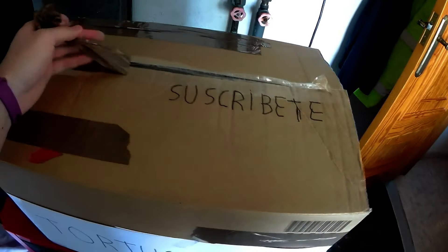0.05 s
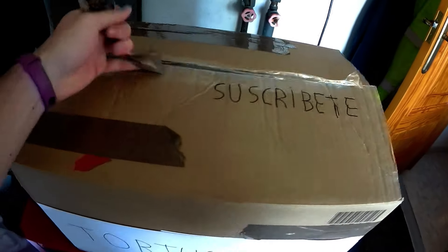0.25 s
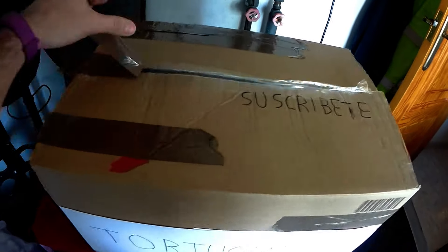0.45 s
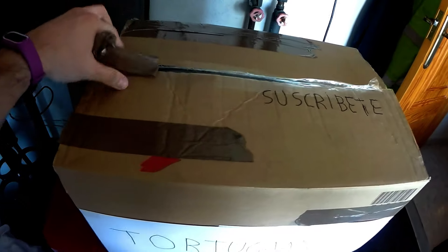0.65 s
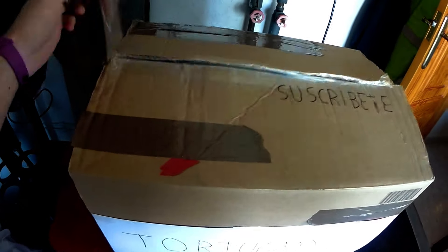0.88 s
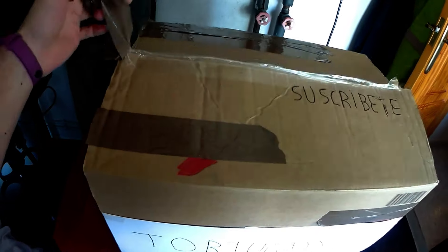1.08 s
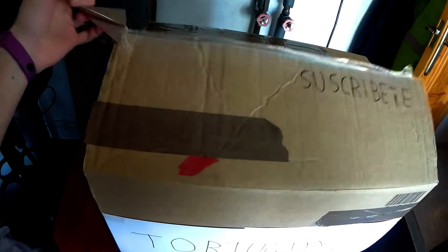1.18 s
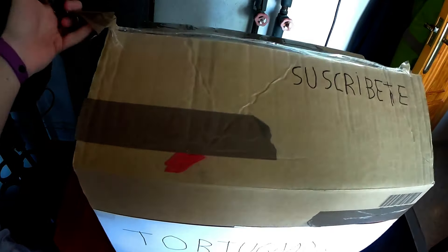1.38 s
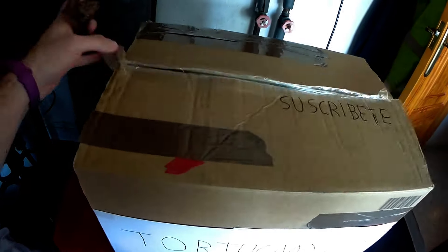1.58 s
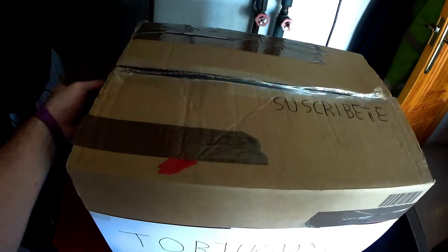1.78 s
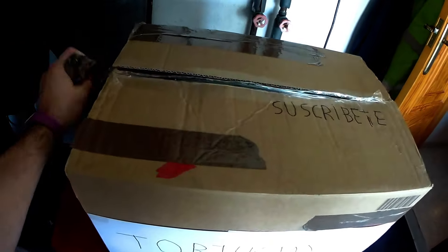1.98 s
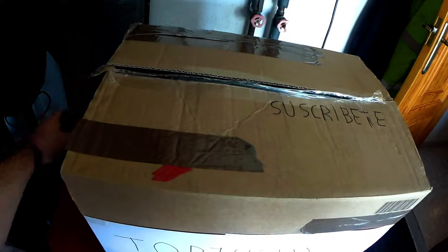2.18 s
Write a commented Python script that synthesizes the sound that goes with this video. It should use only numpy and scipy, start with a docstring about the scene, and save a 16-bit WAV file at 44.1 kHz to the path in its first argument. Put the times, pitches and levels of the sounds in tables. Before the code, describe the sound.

Close up in a small room, packing tape tears from a cardboard box in brief, uneven jerks. Between the rips the loose tape crinkles and scrapes, with hollow knocks from the flaps and a low rumble from the shifting box.

```python
"""Packing tape is ripped off a cardboard box in several short pulls, close by in a small room.
The glue lets go in dense tiny slips that crackle in the film and rasp through the cardboard.
The flaps lift and thump back, the box shifts with a low rumble, and the loose tape
crinkles, snaps and scrapes in the hand throughout."""
import sys
import numpy as np
from scipy import signal
from scipy.fft import rfft, irfft
from scipy.io import wavfile
from scipy.ndimage import uniform_filter1d

SR = 44100
rng = np.random.default_rng(int(sys.argv[2]) if len(sys.argv) > 2 else 0)


def digitize_waveform(pressure):
    """Quantize a signal to 16-bit integers and store it at the path in sys.argv[1].

    Rows of a 2-D input are taken as channels; values are limited to [-1, 1].
    """
    field = np.atleast_2d(pressure).T
    bounded = np.clip(field, -1, 1)
    quanta = np.round(bounded * 32767).astype(np.int16)
    wavfile.write(sys.argv[1], SR, quanta)


N = 99225

# Room decay. Each row: frequency in Hz, T60 in seconds.
ROOM_T60 = [(80, 0.13), (250, 0.3), (700, .6), (2000, 0.46), (5000, 0.32), (11000, 0.12)]
# Box shifting. Each row: time in seconds, rumble level in dB.
SHIFT_LEVELS = [(0, -38.5), (.11, -61), (.19, -43), (.23, -28.5), (.33, -48), (.585, -55.5), (.605, -33),
                (.71, -52), (.78, -30), (.95, -48), (1.12, -56), (1.24, -40), (1.32, -57), (1.46, -55),
                (1.635, -36), (1.675, -29), (1.77, -37.5), (2.04, -40.5), (2.12, -54), (2.25, -46)]
# Tape handling. Each row: time in seconds, crinkle level in dB, scrape level in dB.
HANDLING_LEVELS = [(0, -30.5, -40), (.045, -35, -40), (.11, -31.5, -33.5), (.185, -25, -35),
                   (.29, -25, -25.5), (0.428, -34, -45), (0.482, -36, -46.5), (.59, -43, -34.5),
                   (.635, -34.5, -36), (.71, -33, -34.5), (.89, -26, -40), (0.982, -34, -46),
                   (1.02, -30.5, -63), (1.15, -29, -40.5), (1.3, -28, -47), (1.37, -33, -38),
                   (1.52, -40.5, -34.5), (1.61, -32.5, -36.5), (1.77, -31, -38), (2.03, -33.5, -35),
                   (2.099, -29, -44), (2.25, -30, -48.5)]
# Spectra of box rumble, cardboard scrape, loose film, pulled film and cardboard rasp.
# Each row: frequency in Hz, relative gain in dB.
RUMBLE_SPECTRUM = [(15, -28), (35, -4.5), (62, 4.5), (80, 4), (110, -13.5), (200, -2.5), (500, -1),
                   (2000, -30)]
SCRAPE_SPECTRUM = [(70, -3), (140, -5), (205, 5.5), (300, -4), (440, -6), (650, -8), (1300, -2.5),
                   (2500, -5.5), (4000, -22), (11000, -46)]
LOOSE_FILM_SPECTRUM = [(100, -14), (220, -5.5), (430, 0), (700, 3), (1300, 0.5), (2600, 2), (3900, -5),
                       (5200, -3), (7200, -1), (8200, -4.5), (9200, -11.5), (11000, -12)]
PULLED_FILM_SPECTRUM = [(100, -31), (500, -44.5), (1200, -3.5), (2000, 1), (2800, 4), (3900, -7.5),
                        (5200, -4), (7200, 2), (8200, -2.5), (9200, -11), (11000, -10.5)]
BOARD_SPECTRUM = [(60, -4.5), (140, -16.5), (220, 4.5), (330, -4.5), (440, -1.5), (620, 1.5), (850, -4),
                  (1400, 4), (1900, -10.5), (2900, -6), (4000, -14), (11000, -36.5)]
# Box resonances and notches. Each row: centre in Hz, width in Hz, gain in dB.
BOX_RESONANCES = [(194.4, 39, 4), (277.3, 22, 13), (354, 6.4, 6.5), (637, 46, 7.5), (767, 26, 6),
                  (972.6, 52, 8), (1160, 28, 6), (1358, 18, -11), (1462, 25, 8), (2216, 40, 10),
                  (2490, 44, 4.5), (2634, 17, -5)]
# Flap modes. Each row: ratio to the pitch, level in dB, T60 in seconds.
FLAP_MODES = [(.36, -27.5, 0.11), (0.998, -2, 0.084), (1.378, -6, 0.063), (1.75, -12, 0.02)]
# Flap thumps. Each row: start in seconds, level in dB, pitch in Hz.
FLAP_THUMPS = [(0.213, -17, 202), (.395, -29, 195), (.241, -3, 217), (.264, -4, 254), (0.603, -24, 130),
               (.652, -37, 229), (.811, -8, 205), (0.85, -14, 205), (1.092, -32, 320), (1.196, -23, 192),
               (1.234, -13.5, 212), (1.4429, -6, 209.4), (1.483, -16, 229), (1.574, -18, 208),
               (1.657, -13.5, 204), (1.673, -4.5, 238), (1.851, -20, 210), (1.929, -16, 240),
               (1.984, -12, 225)]
# Film snaps. Each row: start in seconds, level in dB, band centre in Hz, decay in seconds.
FILM_SNAPS = [(.0238, -24, 6000, 0.00043), (.097, -26.5, 5140, 0.0011), (.124, -29, 5000, 0.0005),
              (.1575, -34, 5000, 0.00086), (.1945, -23, 6500, .002), (.3845, -31, 2700, .001),
              (.398, -27, 7000, 0.0027), (.43, -28, 2820, 0.0028), (.635, -26, 3050, .001),
              (.6955, -28, 2820, 0.0027), (.781, -30, 3000, 0.00091), (0.9089, -27, 2470, .002),
              (.921, -17, 3170, 0.00068), (1.0005, -29.5, 5070, 0.0019), (1.1028, -22.5, 1400, 0.0015),
              (1.0475, -23, 3460, 0.0012), (1.061, -31, 1410, 0.0047), (1.0945, -21.5, 1370, 0.00078),
              (1.1465, -22.5, 5440, 0.0013), (1.1735, -33, 6600, 0.00057), (1.1845, -22, 6000, .0007),
              (1.2153, -11.5, 2500, 0.00077), (1.2333, -14, 6500, .0008), (1.2647, -20.5, 6760, 0.0012),
              (1.267, -19, 6800, 0.00094), (1.298, -24, 2120, 0.0026), (1.4425, -38, 6330, 0.0009),
              (1.538, -30.5, 6900, 0.0018), (1.5565, -30, 2960, 0.0011), (1.6415, -30, 4430, 0.00062),
              (1.661, -45, 5070, 0.0011), (1.686, -28, 4330, 0.00052), (1.817, -28.5, 6030, 0.0023),
              (1.9505, -20, 2500, 0.0014), (2.0513, -26, 5600, 0.00071), (2.0807, -23.5, 2520, 0.0014),
              (2.1293, -19, 5400, 0.00094), (2.159, -50, 5840, 0.0017), (2.227, -32, 6200, 0.00078)]
# Tape rips. Each row: start in seconds, length in seconds, film crackle in dB,
# cardboard rasp in dB, panel pitch in Hz, panel ring in dB.
TAPE_RIPS = [(0.2002, 0.032, -8, -6.5, 645, -10.5), (.242, 0.0021, -18, -14, 1320, -21),
             (.251, 0.017, -12.5, -6.5, 966, -16.5), (0.272, 0.029, -25.5, -18, 637, -23),
             (0.623, 0.011, -31, -33, 2700, -26), (0.6517, 0.0063, -26, -22, 1184, -25),
             (0.723, 0.0087, -24, -32, 1385, -22), (0.731, 0.029, -14, -21.5, 1420, -30),
             (0.761, 0.006, -4, -13, 1470, -16), (0.77, 0.034, -15.5, -20, 2550, -26),
             (0.805, 0.013, -23, -19, 655, -23), (.822, 0.046, -24, -33, 1394, -27.5),
             (0.844, 0.011, -37, -23, 1470, -16), (0.9112, 0.012, -22, -30, 1440, -24.5),
             (1.093, 0.0099, -28, -33.5, 1320, -22.5), (1.193, 0.023, -23.5, -20, 1146, -28.5),
             (1.214, 0.047, -30.5, -26.5, 747, -34.5), (1.436, 0.0099, -44, -23, 710, -27.5),
             (1.444, 0.013, -28.5, -17, 1495, -22), (1.479, 0.0069, -33, -15, 2970, -23.5),
             (1.557, 0.036, -31.5, -34, 1063, -40), (1.657, 0.011, -23, -16, 3020, -22),
             (1.672, 0.013, -22, -13, 1450, -14), (1.7, 0.044, -27.5, -26.5, 1454, -27),
             (1.8436, 0.017, -14.5, -20, 1421, -19.5), (1.863, 0.028, -20.5, -23, 616.5, -13),
             (1.885, 0.046, -22, -19.5, 681, -33), (1.923, 0.016, -26, -17.5, 497, -20),
             (1.936, 0.014, -18.5, -19, 574, -16.5), (1.951, 0.036, -22, -17.5, 1322, -30)]

TAPE_ROOM_DB, FLAP_ROOM_DB, EARLY_DB, GAP_S = -9, -16.5, -2, 0.0043
SIDE_DB, SIDE_FROM_HZ, OVERLOAD_LIMIT, LOWPASS_HZ = -24.5, 2680, 0.94, 11200
CRINKLES_PER_S, CRINKLE_SPREAD_DB, FACETS_DB, RUSTLE_DB = 720, 3.1, -2.5, -8
FACET_DECAY_S, SNAP_WIDTH_OCT, SNAP_FOCUS_DB = 0.0012, 0.53, 10.5
THUMP_RISE_S = 0.0037
RIP_RISE_S, RIP_FALL_S, RIP_SAG_DB = 0.002, 0.0056, -3
SLIPS_PER_S, SLIP_SPREAD_DB, JERK_HZ, JERK_DEPTH, FILM_COUPLING = 5000, 1.5, 185.2, 0.46, 0.39


def amp(db):
    """Decibels to gain."""
    return 10 ** (np.asarray(db) / 20)


def rms(x):
    """Root mean square, never zero."""
    return np.sqrt(np.mean(x ** 2) + 1e-20)


def unit(x):
    """Scale to rms 1."""
    return x / rms(x)


def lookup(points, hz):
    """Interpolate a table over log frequency."""
    table_hz, value = np.transpose(points)
    return np.interp(np.log(hz + 1), np.log(table_hz + 1), value)


def gain_curve(points):
    """Seconds and dB to a gain per sample."""
    return amp(np.interp(np.arange(N) / SR, *np.transpose(points)))


def add(mix, start_s, sound):
    """Mix a sound in place."""
    part = mix[max(round(start_s * SR), 0):][:len(sound)]
    part += sound[:len(part)]


def colour(x, db_at, size=4096):
    """Minimum-phase filter of unit energy, shaped by db_at(hz)."""
    log_gain = np.log(amp(db_at(abs(np.fft.fftfreq(size, 1 / SR)))))
    impulse = np.fft.ifft(np.exp(np.conj(signal.hilbert(log_gain)))).real
    return signal.fftconvolve(x, impulse / np.linalg.norm(impulse))[:len(x)]


def clicks(samples, per_s, spread_db):
    """Random clicks, most small, a few large."""
    size = amp(spread_db * np.minimum(rng.exponential(1, samples), 4))
    return size * rng.choice([-1, 1], samples) * (rng.random(samples) < per_s / SR)


def wavering(samples, hz, depth, waver_hz):
    """Sine with randomly wandering pitch."""
    wander = unit(signal.lfilter(*signal.butter(2, waver_hz, fs=SR), rng.standard_normal(samples)))
    return np.sin(2 * np.pi * np.cumsum(hz * (1 + depth * wander)) / SR)


def room(x, reflections=10):
    """Near reflections, then a tail that dies soonest in bass and treble."""
    taps = rng.choice([-1., 1.], SR) * (rng.random(SR) < 4000 / SR) * (np.arange(SR) > GAP_S * SR)
    hz, t, bands = signal.stft(taps, SR, nperseg=256)
    decay = amp(-60 * t / lookup(ROOM_T60, hz)[:, None])
    impulse = signal.istft(bands * decay, SR, nperseg=256)[1][:SR]
    impulse /= np.linalg.norm(impulse)
    early_at = (rng.uniform(.002, .02, reflections) * SR).astype(int)
    impulse[early_at] += amp(EARLY_DB) * rng.choice([-1, 1], reflections) / np.sqrt(reflections)
    spectrum = rfft(impulse)
    local_power = uniform_filter1d(abs(spectrum) ** 2, size=16)
    flattened = irfft(spectrum / np.sqrt(local_power + 1e-9))[:SR * 3 // 4]
    flattened[:SR // 500 + 1] = 0
    return signal.fftconvolve(x, flattened)[:N]


def box_db(hz):
    """The box's resonances lift or notch narrow bands."""
    return sum(db / (1 + (2 * (hz - centre_hz) / width_hz) ** 2)
               for centre_hz, width_hz, db in BOX_RESONANCES)


def box_shift():
    """The box drags on its support with a low rumble."""
    rumble = colour(rng.standard_normal(N), lambda hz: lookup(RUMBLE_SPECTRUM, hz))
    return gain_curve(SHIFT_LEVELS) * unit(rumble)


def film_snap(db, centre_hz, decay_s):
    """A crease flips over and flutters briefly, favouring a band of its own."""
    def facet_db(hz):
        focus = np.exp(-(np.log2((hz + 1) / centre_hz) / SNAP_WIDTH_OCT) ** 2)
        return lookup(LOOSE_FILM_SPECTRUM, hz) + SNAP_FOCUS_DB * focus

    env = np.exp(-np.arange(SR // 40) / SR / decay_s)
    crack = colour(env * rng.standard_normal(len(env)), facet_db, size=1024)
    return amp(db) * unit(crack) * rms(2 * env)


def loose_tape(facet_count=20):
    """Facets snap at random over a fine rustle while the tape scrapes the cardboard."""
    facets = np.zeros(N)
    for centre_hz in np.geomspace(1200, 8000, facet_count):
        flips = clicks(N, CRINKLES_PER_S / facet_count, CRINKLE_SPREAD_DB)
        facets += signal.fftconvolve(flips, film_snap(0, centre_hz, FACET_DECAY_S))[:N]
    rustle = colour(clicks(N, per_s=6000, spread_db=2.4), lambda hz: lookup(LOOSE_FILM_SPECTRUM, hz))
    crinkle = amp(FACETS_DB) * unit(facets) + amp(RUSTLE_DB) * unit(rustle)
    friction = clicks(N, per_s=2500, spread_db=1.7)
    scrape = colour(friction, lambda hz: lookup(SCRAPE_SPECTRUM, hz) + box_db(hz) / 2)
    crinkle_gain = gain_curve([(s, db) for s, db, _ in HANDLING_LEVELS])
    scrape_gain = gain_curve([(s, db) for s, _, db in HANDLING_LEVELS])
    return crinkle_gain * crinkle + scrape_gain * unit(scrape)


def flap_thump(db, pitch_hz):
    """A flap springs back with a soft, hollow knock."""
    t = np.arange(SR // 4) / SR
    ring = sum(amp(mode_db - 60 * t / t60_s) * np.sin(2 * np.pi * pitch_hz * ratio * t)
               for ratio, mode_db, t60_s in FLAP_MODES)
    rise = 1 - np.exp(-(t / THUMP_RISE_S) ** 2)
    return amp(db) * rise * ring


def tape_rip(length_s, film_db, board_db, panel_hz, panel_db):
    """Glue slips in uneven jerks, shaking film and cardboard; the panel chatters at its own pitch."""
    t = np.arange(SR // 5) / SR
    rise = np.minimum(t / RIP_RISE_S, 1)
    sag = amp(RIP_SAG_DB * (np.minimum(t / length_s, 1) + 1))
    fall = np.exp(-np.maximum(t - length_s, 0) / RIP_FALL_S)
    env = rise * sag * fall
    jerks = np.exp(JERK_DEPTH * wavering(len(t), JERK_HZ, depth=0.419, waver_hz=117))
    slips = clicks(len(t), SLIPS_PER_S, SLIP_SPREAD_DB) * jerks * env
    film = colour(slips, lambda hz: lookup(PULLED_FILM_SPECTRUM, hz) + FILM_COUPLING * box_db(hz))
    board = colour(slips, lambda hz: lookup(BOARD_SPECTRUM, hz) + box_db(hz))
    panel = wavering(len(t), panel_hz, depth=0.053, waver_hz=245) * jerks * env
    rasp = amp(film_db) * unit(film) - amp(board_db) * unit(board)
    ring = amp(panel_db) * unit(panel)
    return rms(env) * rasp, rms(env) * ring


def scene():
    """Tape and box centred; a faint difference between the channels hangs in the treble."""
    tape, flaps = loose_tape(), np.zeros(N)
    for start_s, *row in TAPE_RIPS:
        rasp, ring = tape_rip(*row)
        add(tape, start_s, rasp)
        add(flaps, start_s, ring)
    for start_s, *row in FILM_SNAPS:
        add(tape, start_s, film_snap(*row))
    for start_s, *row in FLAP_THUMPS:
        add(flaps, start_s, flap_thump(*row))
    room_send = amp(TAPE_ROOM_DB) * tape + amp(FLAP_ROOM_DB) * flaps
    mid = tape + flaps + box_shift() + room(room_send)
    highpass = signal.butter(4, SIDE_FROM_HZ, "high", fs=SR, output="sos")
    side = amp(SIDE_DB) * signal.sosfilt(highpass, room(tape))
    return np.array([mid + side, mid - side])


def record(dry):
    """Soft overload on the loudest peaks, then a low-pass."""
    squashed = dry / (1 + (dry / OVERLOAD_LIMIT) ** 4) ** (1 / 4)
    lowpass = signal.firwin(401, LOWPASS_HZ, window=("kaiser", 9), fs=SR)
    return signal.oaconvolve(squashed, lowpass[None], "same", axes=1)


dry = scene()
out = record(dry)
digitize_waveform(out)
```